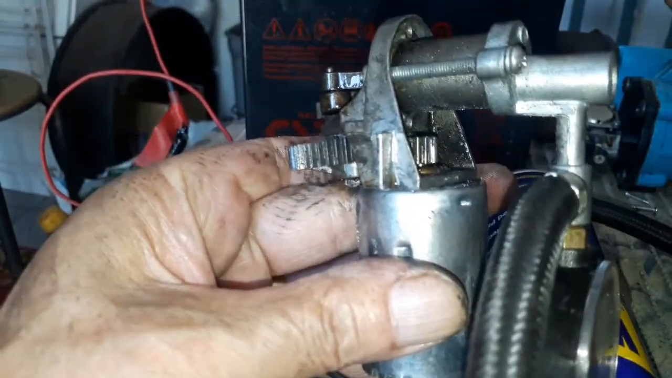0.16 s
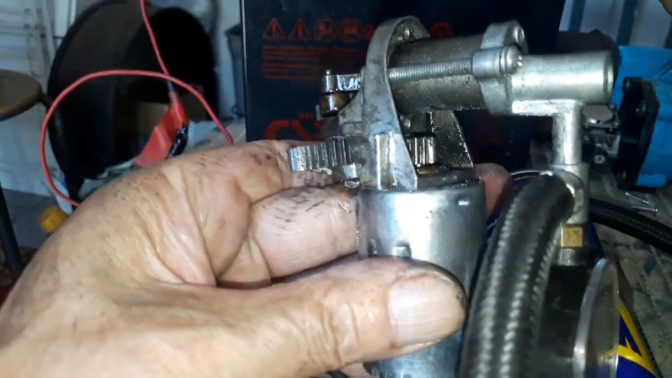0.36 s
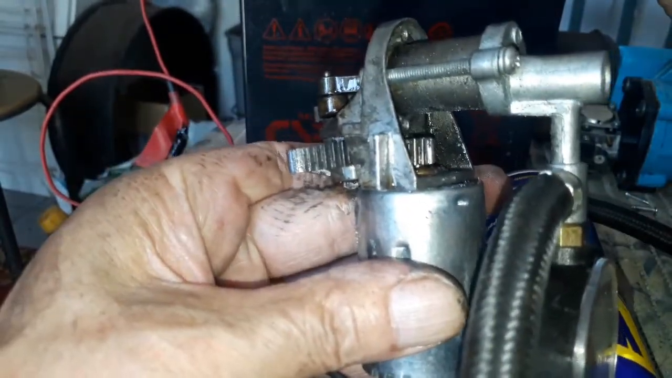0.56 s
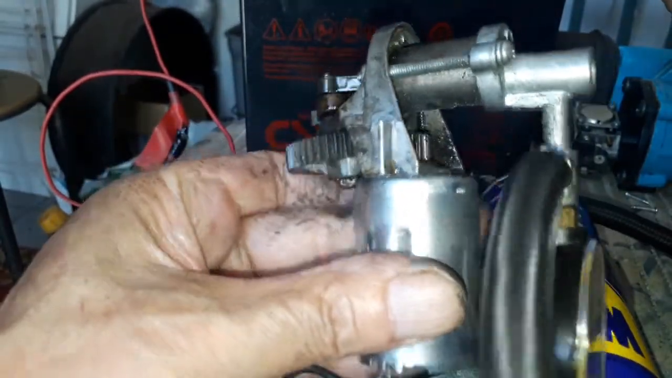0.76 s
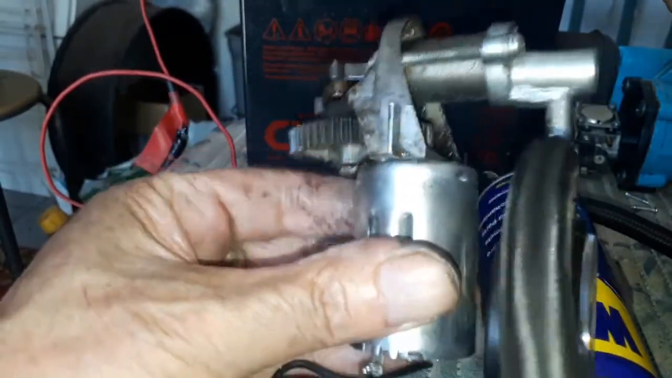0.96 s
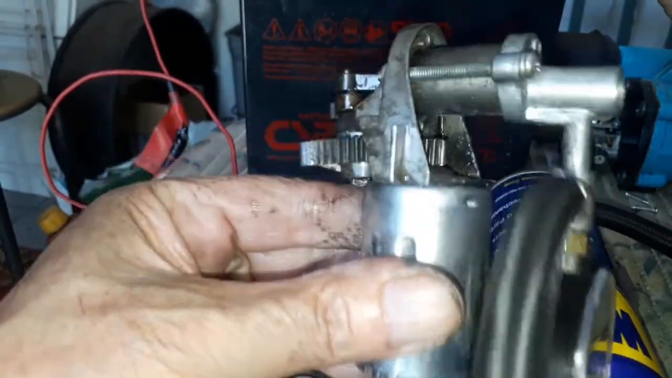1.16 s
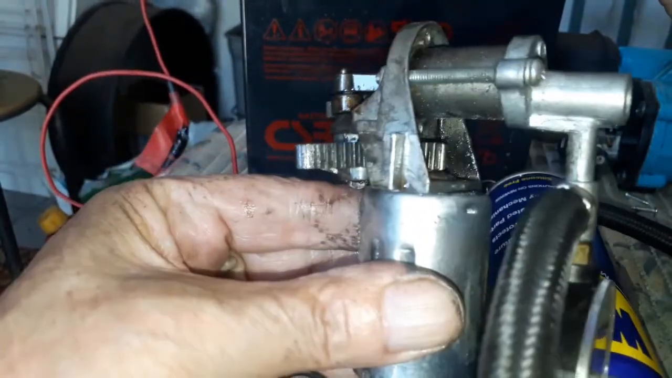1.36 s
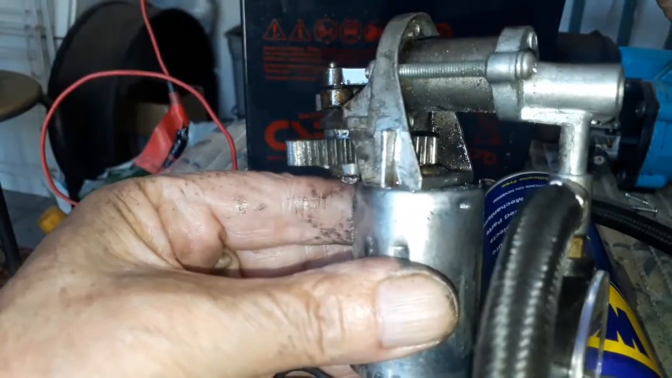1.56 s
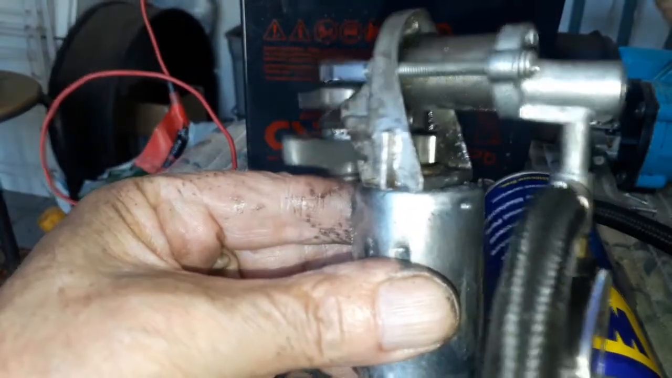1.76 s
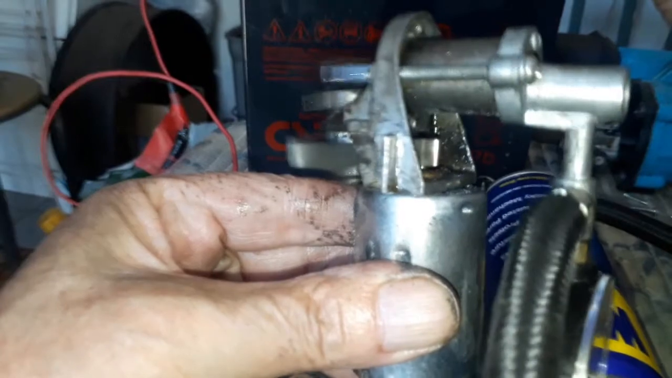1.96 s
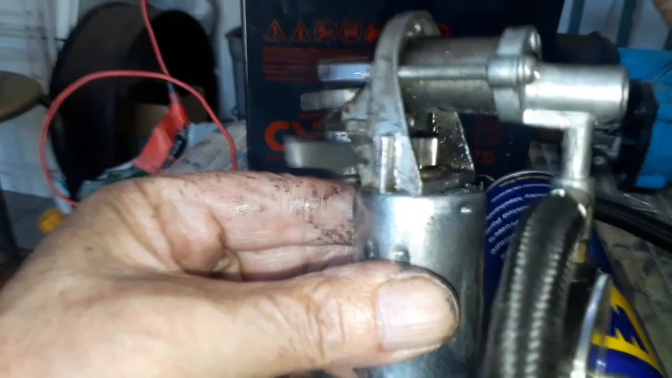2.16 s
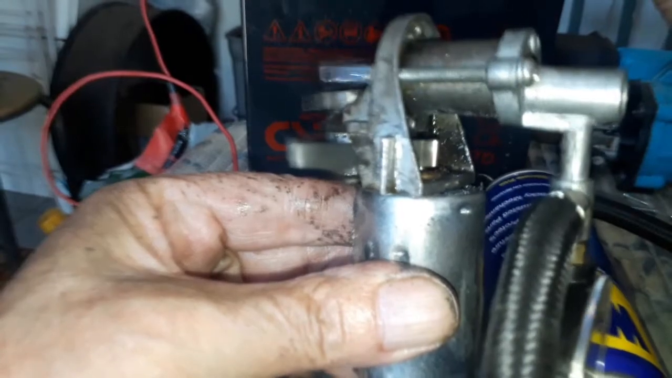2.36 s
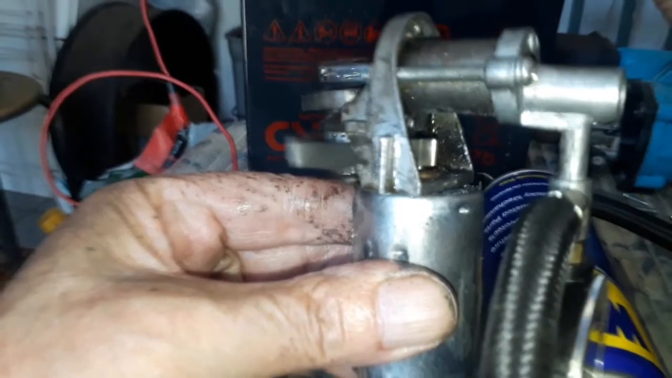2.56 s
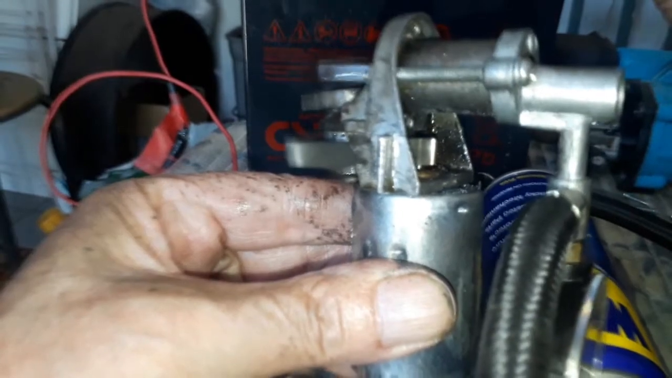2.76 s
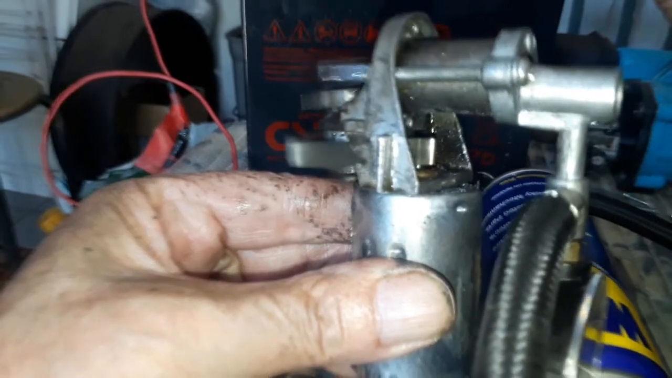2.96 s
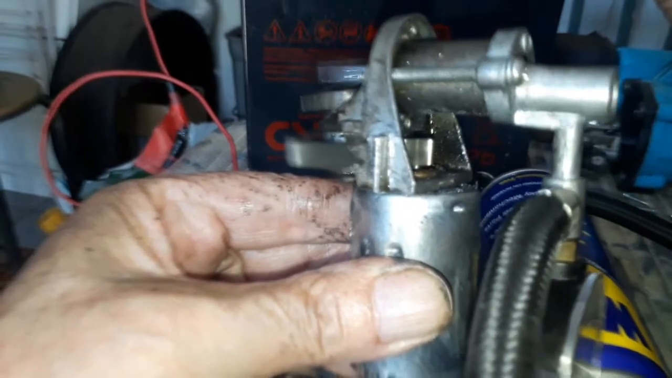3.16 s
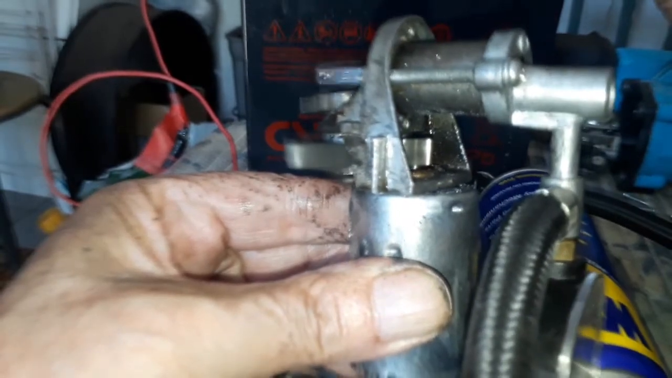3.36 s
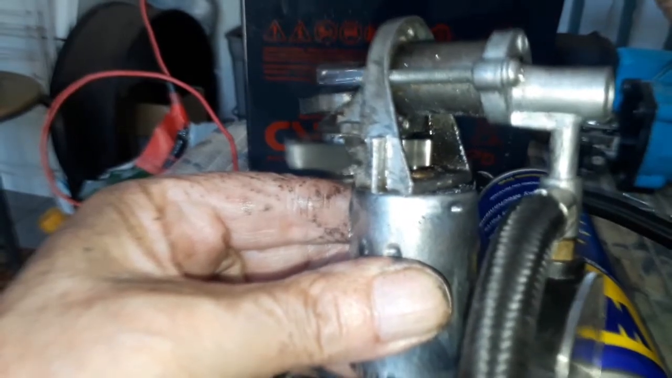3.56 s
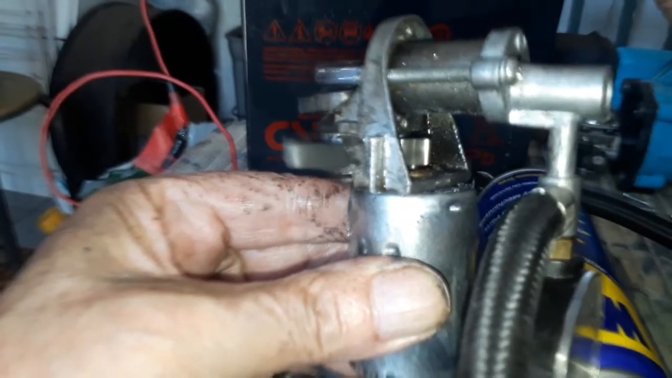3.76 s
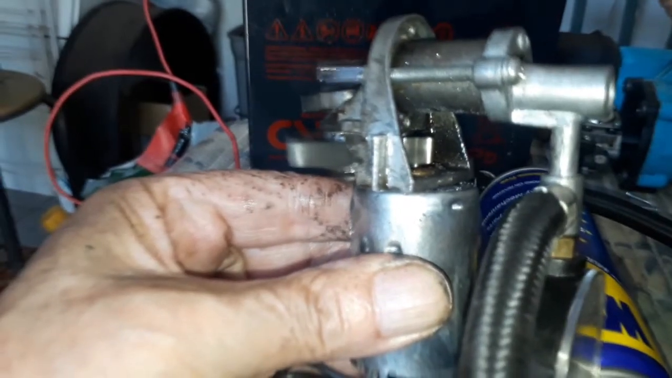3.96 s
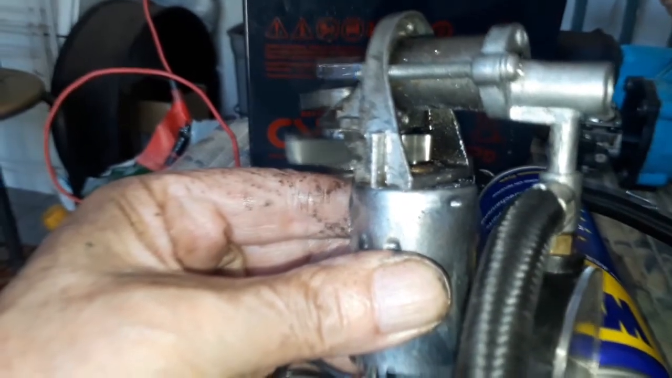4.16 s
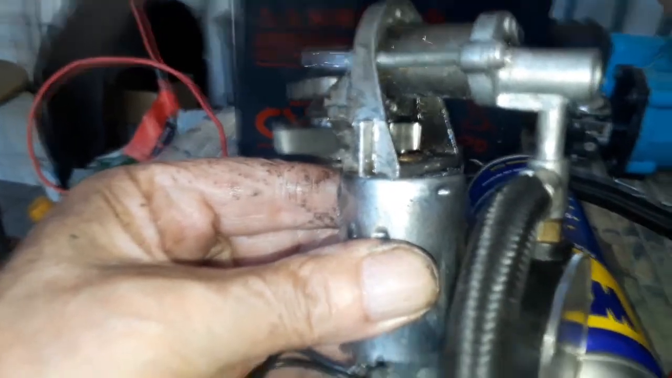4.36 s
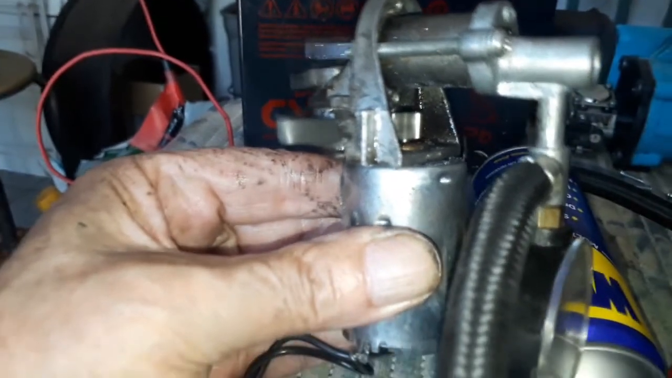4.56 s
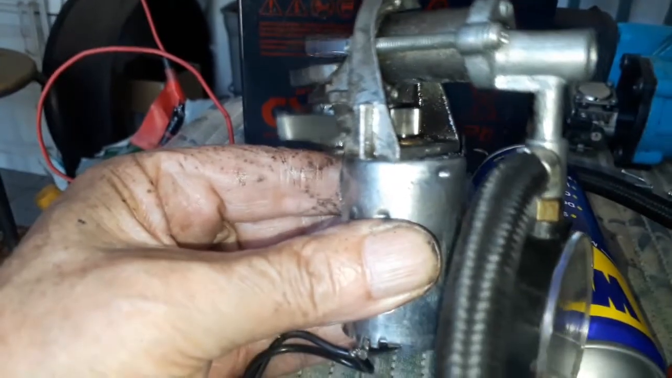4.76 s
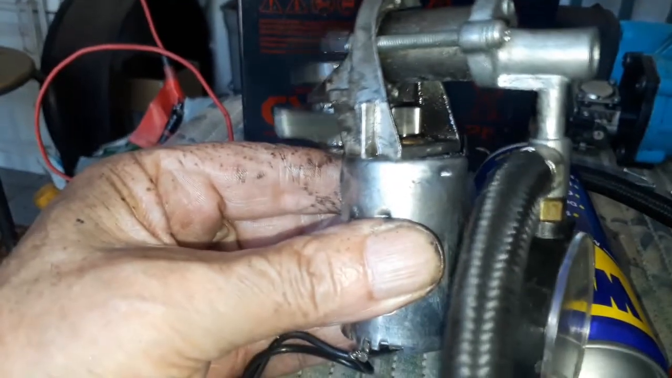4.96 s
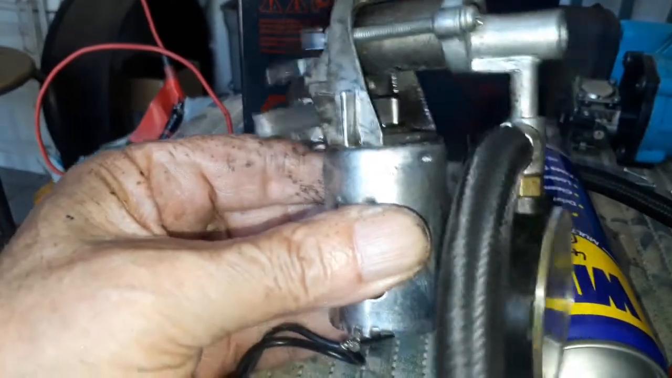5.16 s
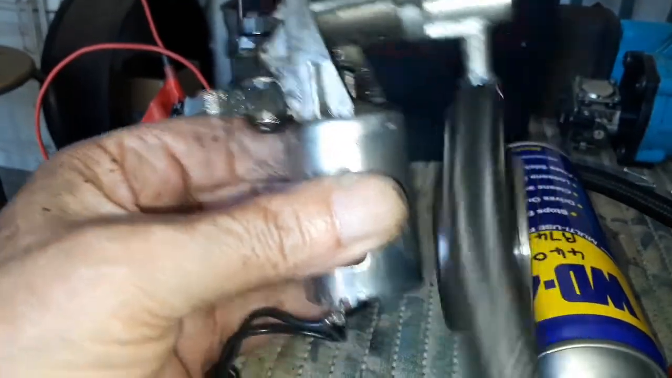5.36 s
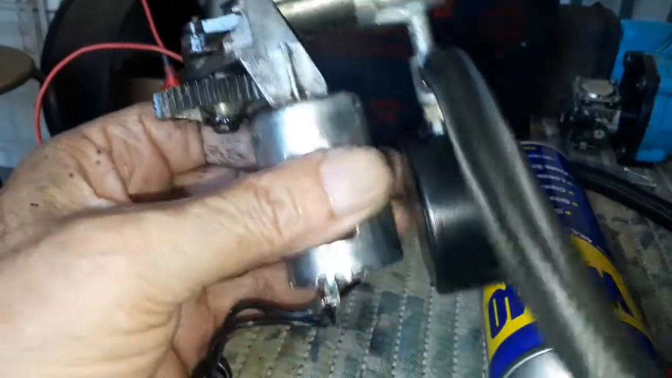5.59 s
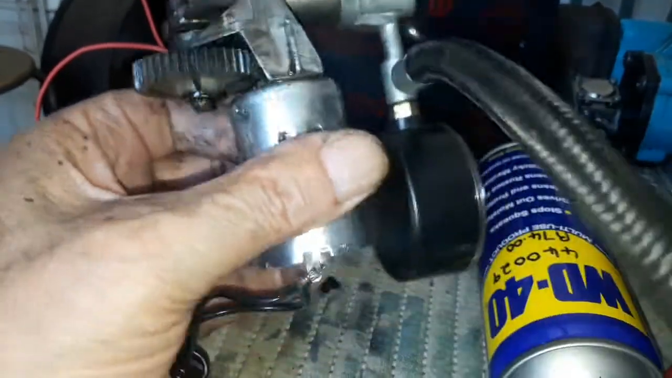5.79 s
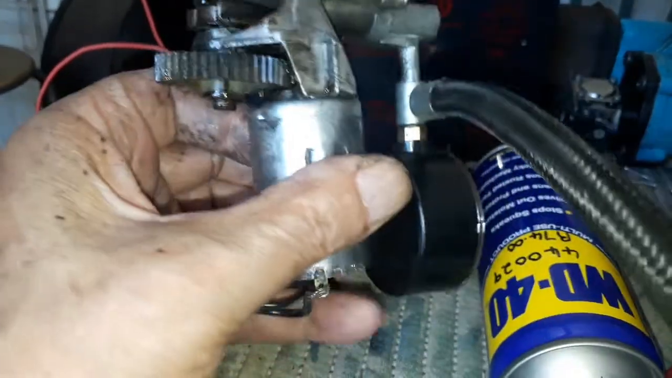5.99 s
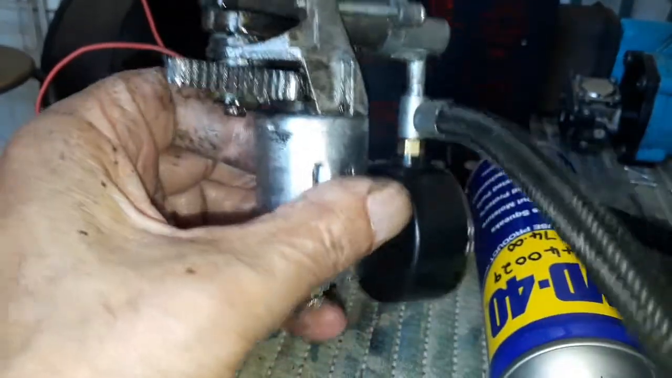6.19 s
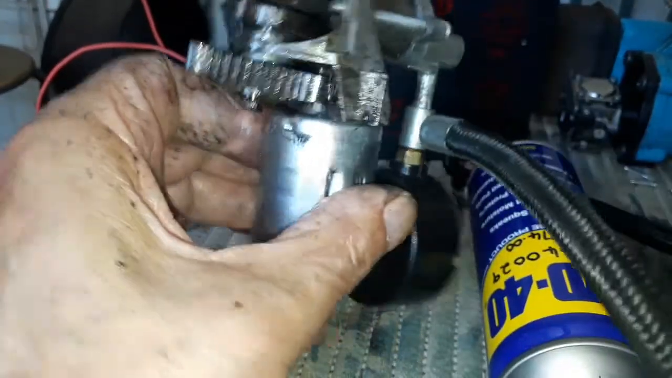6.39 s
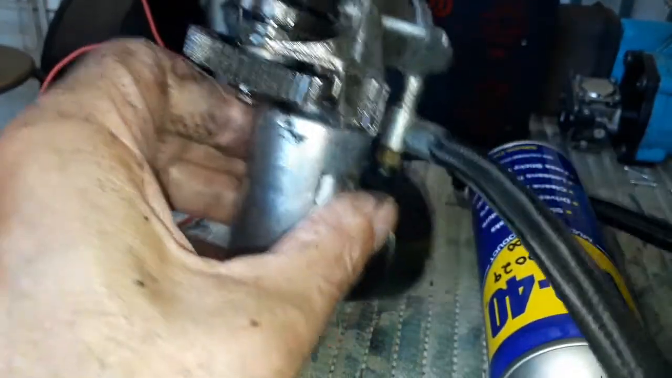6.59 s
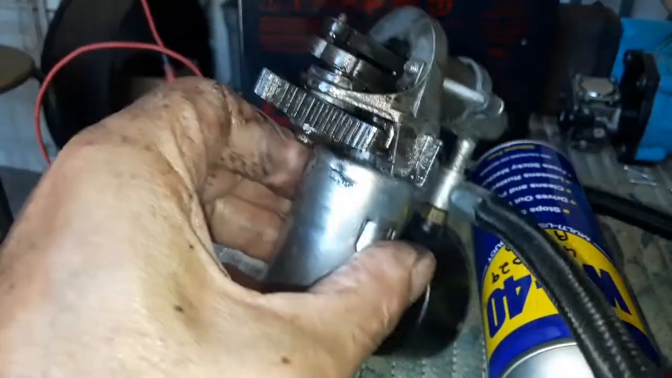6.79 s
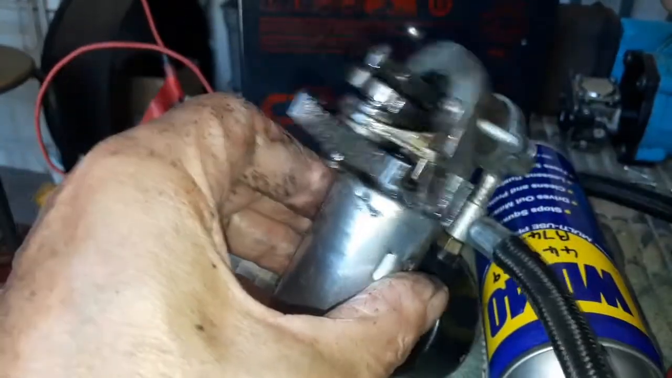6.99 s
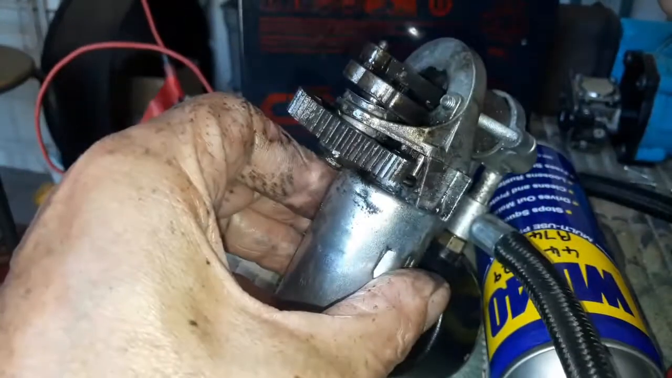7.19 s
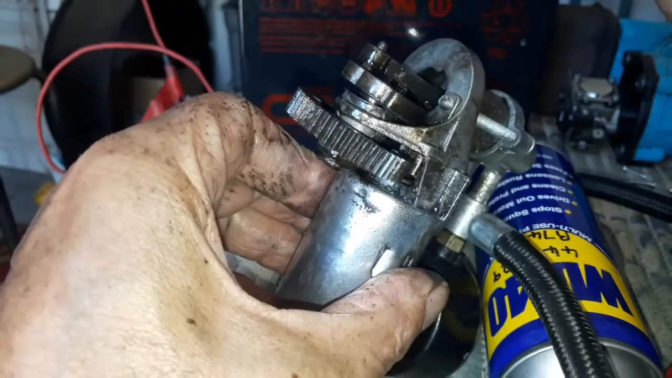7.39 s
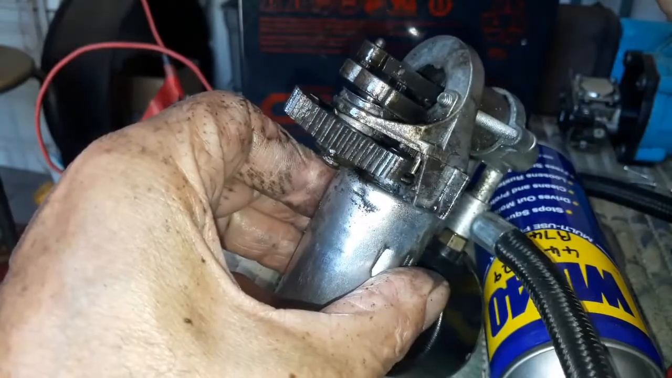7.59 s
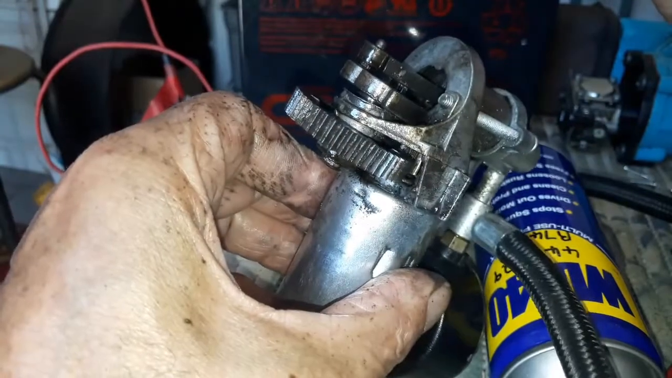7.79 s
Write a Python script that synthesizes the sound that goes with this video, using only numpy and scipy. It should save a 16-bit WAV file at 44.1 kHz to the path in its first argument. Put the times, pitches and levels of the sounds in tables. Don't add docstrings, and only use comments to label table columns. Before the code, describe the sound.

From 0 to 1.7 seconds there is soft, low room and microphone hiss with faint ticks, dull grip thuds and skin rubbing on metal, busiest around 1 second, where a fitting clinks softly. At about 1.76 a small piston compressor jerks on and climbs to full speed by 2.1. Until 4.7 it gives a loud, close, harsh metallic buzz: nearly a hundred hard knocks a second with bounces, bright ringing, rough gear chatter and little bass, only a weak hum beneath. Power goes off at 4.68; pitch and pace drop fast, breaking into irregular separate clacks around 4.9 to 5.1 and weak last ticks by 5.3. The hiss returns. Quiet taps, clinks and rustles cluster near 5.8, 6.0, 6.45 and 7.0, with a very faint high squeak at 6.1 to 6.3 and a last tap at 7.3, then only hiss. A short workshop echo follows the sounds.

```python
import sys
import numpy as np
from scipy import signal
from scipy.fft import rfft, irfft, next_fast_len
from scipy.io import wavfile
from scipy.ndimage import map_coordinates

SR = 44100
rng = np.random.default_rng(int(sys.argv[2]) if len(sys.argv) > 2 else 0)


def amp(db):
    return 10 ** (np.asarray(db, float) / 20)


def write(x):
    x = np.atleast_2d(x).T
    wavfile.write(sys.argv[1], SR, np.round(np.clip(x, -1, 1) * 32767).astype(np.int16))


N = 345556
TIME = np.arange(N) / SR

# (time [s], speed [turns/s])
CRANK_SPEED = [
    (1.755, 0),
    (1.8, 35.07),
    (1.88, 37.69),
    (1.97, 43.4),
    (2.1, 48.25),
    (4.68, 48.25),
    (4.78, 37.3),
    (4.88, 29.15),
    (5.25, 4.5),
]
# (place [part of a turn], level [dB], size scatter [dB], timing scatter [ms])
STROKE_BLOWS = [
    (0, 1.5, 2, .2),
    (.05, -5, 3.2, .35),
    (.13, -3.5, 3.5, .35),
    (.2, -11, 3.2, .6),
    (.48, 0, 2.1, .25),
    (.55, -7, 3.2, .45),
    (.62, -14, 3, .6),
]
# (time [s], peak level [dB])
SINGLE_BLOWS = [(1.7624, -14), (4.903, -3), (4.9199, 0), (4.925, -7.5), (4.941, -6), (4.9616, -1),
                (4.9837, -3.5), (5.0004, -15), (5.0048, -0.56), (5.015, -7), (5.0335, -3.5), (5.055, -11.5),
                (5.0598, -5), (5.0628, -5), (5.0726, -11), (5.0948, -5.5), (5.1297, -7.5), (5.1791, -8),
                (5.24, -13), (5.2486, -14), (5.2683, -16), (5.2744, -24), (5.2842, -19), (5.2984, -24),
                (5.3084, -26)]
# (time [s], length [s], level [dB])
SPURTS = [
    (5.12, .07, -29),
    (5.172, .075, -33),
    (5.225, .115, -35),
]
# (frequency [Hz], level [dB per Hz])
KNOCK_TONE = [(70, -40), (150, -25.5), (300, -15), (650, -11.5), (1050, -12.5), (1900, -5), (2980, 0),
              (4420, -1), (6680, 0), (7700, -6), (9500, -14.5), (12000, -14.5), (15300, -15.5),
              (16500, -20)]
# (frequency [Hz], level [dB per Hz])
RATTLE_TONE = [(60, -40), (110, -24), (230, -5.5), (350, -18), (655, -6.5), (1050, -11.5), (2920, -2.5),
               (4390, -6.5), (6730, -2.5), (9470, -15.5), (15100, -15.5), (16500, -20)]
# (frequency [Hz], width [Hz], lift [dB])
FRAME_RINGS = [(651, 40, -1.5), (2081, 94, -2), (2980, 110, -12), (3928, 200, -7), (5480, 200, -6),
               (6950, 630, -3.5), (9300, 110, -13), (11360, 2000, -3), (12600, 1800, -11), (14800, 500, -9)]
# (multiple of the crank speed, level [dB])
CRANK_HUM = [(1, -4), (3, -4), (5, 1.5), (6, -9.5), (7, -4), (8, -12), (9, -2), (10, -1), (11, -6),
             (12, -1), (13, -2.5), (14, -4)]
# (multiple of the motor speed, level [dB])
MOTOR_HUM = [(1, -3), (3, -2), (5, -9)]

# (time [s], peak level [dB], ring [Hz])
TAPS = [(0.874, -54, 576), (1.041, -57, 678), (1.1, -49, 480), (5.514, -57, 544), (5.523, -55, 544),
        (5.808, -41, 2000), (5.833, -41, 693), (5.85, -53, 620), (6.024, -41, 753), (6.406, -61, 887),
        (6.464, -47, 1046), (6.687, -49.5, 684), (6.944, -59.5, 1070), (6.984, -45.5, 890),
        (6.999, -45.5, 687), (7.025, -60.5, 697), (7.311, -42, 1060)]
# (time [s], peak level [dB], tick [Hz], ring [Hz])
TICKS = [(0.246, -65, 2570, 1210), (0.748, -64, 2690, 861), (0.86, -71, 2200, 2120),
         (0.996, -55, 2200, 2070), (1.028, -52.5, 5300, 2170), (1.523, -57, 2310, 530),
         (1.649, -74, 2260, 1020), (5.669, -70, 5590, 1160), (5.808, -59, 4500, 700),
         (5.841, -56, 4500, 664), (5.853, -64, 5020, 1500), (6.026, -60, 2300, 1980),
         (6.03, -66, 6040, 2000), (6.266, -65, 3000, 1480), (6.267, -68, 6000, 1480),
         (6.424, -70, 3770, 619), (6.809, -76, 6860, 557), (6.984, -64, 5570, 890)]
# (time [s], peak level [dB])
THUDS = [(0.569, -62), (1.012, -55), (1.045, -60), (1.238, -48), (1.523, -59), (5.845, -58), (6.03, -61),
         (6.599, -65), (6.69, -59), (6.748, -55), (6.81, -62), (6.975, -60), (7.005, -54), (7.025, -60)]
# (time [s], peak level [dB])
CLINKS = [
    (0.9946, -51),
    (1.0291, -54),
    (5.8087, -43),
    (5.8386, -47),
    (6.0257, -50),
]
# (frequency [Hz], level [dB], time to fall 60 dB [s])
FITTING_RINGS = [(1542, -15, 0.18), (2000, -4, 0.071)]
# (peak time [s], time to fall 20 dB [s], level [dB])
RUSTLES = [
    (.865, .03, -65),
    (.995, .045, -56),
    (1.105, 0.02, -63),
    (1.15, 0.1, -69),
    (5.675, 0, -68.5),
    (5.79, .09, -67),
    (5.85, 0.1, -65),
    (6.02, 0.1, -61.5),
    (6.995, 0.08, -57.5),
]
# (peak time [s], time to fall 20 dB [s], level [dB])
SCUFFS = [
    (.865, .05, -71),
    (1.11, .06, -68),
    (5.675, .04, -69),
]
# (frequency [Hz], level [dB per Hz])
SKIN_TONE = [(70, -26.5), (130, -2), (500, -6), (750, -5), (1200, -9), (2600, -15), (3800, -22),
             (5800, -16), (7500, -23.5), (16000, -36.5)]
# (time [s], pitch [Hz], level [dB])
SQUEAK = [
    (6.041, 2980, -94),
    (6.08, 3120, -79),
    (6.13, 3200, -77),
    (6.19, 3100, -88),
    (6.3, 3030, -75),
    (6.33, 3020, -95),
]

# (frequency [Hz], time to fall 60 dB [s])
SHOP_DECAY = [(200, 0.6), (2000, .35), (7000, 0.27), (14000, 0.05)]
# (frequency [Hz], level [dB per Hz])
AIR_TONE = [(30, -20), (55, -15.5), (110, 1), (200, -1.5), (330, -6.5), (700, -12.5), (1500, -16),
            (3000, -18), (5000, -22), (6600, -19), (8000, -28.5), (9800, -27.5), (12500, -23), (16500, -28)]
# (time [s], rounding step over the mean line [dB])
COARSE_MOMENTS = [(2.1753, 13), (2.3033, 13), (2.4527, 14), (2.666, 13), (2.7727, 13), (3.626, 14),
                  (3.6687, 14), (4.3513, 12), (4.6713, 11), (4.855, 17), (5.098, 14)]

GEAR_RATIO = 4.6
POWER_OFF_S = 4.68


def unit(x):
    return x / np.sqrt(np.mean(x ** 2) + 1e-30)


def curves(rows, outside):
    s, *cols = np.transpose(rows)
    return [np.interp(TIME, s, c, outside, outside) for c in cols]


def along(points, hz):
    f, v = np.transpose(points)
    return np.interp(np.log(hz + 1), np.log(f + 1), v)


def wobble(rate):
    knots = rng.standard_normal(int(N * rate / SR) + 4)
    return map_coordinates(knots, [TIME * rate])


def coloured(x, spectrum, peaks=()):
    m = 2 * next_fast_len(len(x) // 2 + 4096)
    hz = np.fft.rfftfreq(m, 1 / SR)
    lift = sum(amp(db) / (1 + (2 * (hz - centre) / width) ** 2) for centre, width, db in peaks)
    gain = amp(along(spectrum, hz)) * (1 + lift)
    cepstrum = irfft(np.log(gain + 1e-6), m)
    cepstrum[1:m // 2] *= 2
    cepstrum[m // 2 + 1:] = 0
    return irfft(rfft(x, m) * np.exp(rfft(cepstrum)), m)[:len(x)]


def band(x, lo_hz, hi_hz):
    return signal.sosfilt(signal.butter(2, [lo_hz, hi_hz], "bandpass", fs=SR, output="sos"), x)


def bursts(times, sizes, rise, t60):
    places = np.clip(np.round(times * SR).astype(int), 0, N - 1)
    marks = np.bincount(places, sizes ** 2, N)
    t = TIME[:SR // 20]
    shape = amp(-60 * t / t60) * (1 - np.exp(-t / rise))
    power = signal.fftconvolve(marks, shape ** 2)[:N]
    return np.sqrt(np.abs(power)) * rng.standard_normal(N)


def compressor():
    speed, = curves(CRANK_SPEED, 0)
    start_turn = .49
    angle = start_turn + np.cumsum(np.abs(speed)) / SR
    pace = speed / speed.max()
    knock_db, rattle_gain, hum_gain = effort(pace)
    knocks = stroke_knocks(speed, angle, start_turn, knock_db)
    rattle = gear_rattle(angle)
    knocks = dull(knocks, .4 * (1 - pace))
    rattle = dull(rattle, .7 * (1 - pace))
    return knocks + rattle_gain * rattle + hum_gain * hum(angle, pace)


def effort(pace):
    powered = TIME < POWER_OFF_S
    surge = powered * np.clip((1 - pace) / .2, 0, 1)
    decades = np.log10(pace + 1e-12)
    settle_db = 1.06 * np.exp(-np.abs(TIME - CRANK_SPEED[0][0]) / .6)
    knock_db = -16.2 + 14 * decades + 1.2 * surge + settle_db
    rattle_db = -26.6 + 10.5 * decades + 5 * surge + settle_db
    engage_s = 1.7615
    driven = np.where(TIME < engage_s, .05, 1)
    coasting = np.clip((pace - .21) / .08, 0, 1)
    rattle = np.where(powered, driven, coasting) * amp(rattle_db)
    for s, length, db in SPURTS:
        progress = np.clip((TIME - s) / length, 0, 1)
        rattle = rattle + amp(db) * np.sin(np.pi * progress ** .6) ** 2
    hum_gain = amp(-45.5 + 7 * (1 - pace))
    return knock_db, rattle, hum_gain


def stroke_knocks(speed, angle, start_turn, knock_db):
    part, db, size_db, ms = np.transpose(STROKE_BLOWS)
    turns = np.arange(int(angle[-1]) + 1)[:, None]
    time_chance, size_chance = rng.standard_normal((2, len(turns), len(part)))
    ends = .96 * np.round(2 * part - .4) / 2
    lag = (part - ends) / speed.max()
    at = turns + ends
    steady_until = 4.895
    inside = (at > start_turn) & (at < angle[round(steady_until * SR)])
    times = np.interp(at, angle, TIME) + lag - .0008 + time_chance * ms / 1000
    slow_db = -7 * np.log10(np.interp(times, TIME, speed + 3) / speed.max())
    blow_db = db + size_db * size_chance + slow_db + np.interp(times, TIME, knock_db) + 9
    sizes = inside * amp(blow_db)
    s, peak_db = np.transpose(SINGLE_BLOWS)
    all_times = np.r_[times.ravel(), s]
    all_sizes = np.r_[sizes.ravel(), amp(peak_db - 4)]
    blows = bursts(all_times, all_sizes, rise=.00045, t60=.013)
    impulse = np.zeros(N)
    impulse[0] = 1
    answer = coloured(impulse, KNOCK_TONE, FRAME_RINGS)
    return coloured(blows, KNOCK_TONE, FRAME_RINGS) / np.linalg.norm(answer)


def gear_rattle(angle):
    swell_db = 2.5 * wobble(900) + wobble(60) + np.cos(2 * np.pi * GEAR_RATIO * angle)
    return unit(coloured(amp(swell_db) * rng.standard_normal(N), RATTLE_TONE, FRAME_RINGS))


def dull(x, share):
    return (1 - share) * x + share * band(x, 110, 8100)


def hum(angle, pace):
    crank_turn = angle - .06 + .004 * wobble(14)
    motor_turn = GEAR_RATIO * angle + .025 * wobble(6)
    both = np.zeros(N)
    for k, db in CRANK_HUM:
        both += amp(db + 1.3 * wobble(12)) * pace ** (6 / k) * np.sin(2 * np.pi * k * crank_turn)
    for k, db in MOTOR_HUM:
        both += amp(db + 1.5 * wobble(10)) * pace * np.sin(2 * np.pi * k * motor_turn)
    fade = pace ** np.where(TIME < POWER_OFF_S, .5, 2)
    return band(both * fade, 120, 4000)


def hand():
    return hand_clicks() + hand_rubs() + squeak()


def clicks():
    taps = [(s, db, -68, db - 27, hz, 4000) for s, db, hz in TAPS]
    ticks = [(s, db + 3, db - 9, db, hz, tick_hz) for s, db, tick_hz, hz in TICKS]
    thuds = [(s, db - 4, db, db - 24, 450, 3000) for s, db in THUDS]
    return taps + ticks + thuds


def hand_clicks():
    out = np.zeros(N + SR)
    t = TIME[:SR // 3]
    rise = 1 - np.exp(-t / 0.00039)
    push = 3.5 * band(np.sin(2 * np.pi * 170 * t) * amp(-60 * t / .035), 95, 900)
    for s, ring_db, thud_db, tick_db, hz, tick_hz in clicks():
        decay = amp(-60 * t / [[.022], [.05], [.022]])
        body, rough, bright = rng.standard_normal((3, len(t))) * decay * rise
        tone = np.sin(2 * np.pi * hz * t) * amp(-60 * t / 0.031) * rise
        ring = amp(ring_db) * (1.6 * band(body, 500, 1300) + 0.92 * tone)
        thud = amp(thud_db) * (push + amp(13) * band(rough, 80, 350))
        tick = amp(tick_db + 18.5) * band(bright, tick_hz / 1.4, tick_hz * 1.21)
        out[round(s * SR):][:len(t)] += ring + thud + tick
    for s, db in CLINKS:
        for hz, level, t60 in FITTING_RINGS:
            tone = amp(db + level - 60 * t / t60) * np.sin(2 * np.pi * hz * t)
            out[round(s * SR):][:len(t)] += rise * tone
    return out[:N]


def strokes(rows):
    return sum(amp(db - 20 * np.abs(TIME - s) / fall) for s, fall, db in rows)


def hand_rubs():
    grain = amp(3 * wobble(150)) * rng.standard_normal(N)
    rub = strokes(RUSTLES) * unit(coloured(grain, SKIN_TONE))
    scuff = strokes(SCUFFS) * unit(band(rng.standard_normal(N), 4500, 6600))
    return rub + scuff


def squeak():
    hz, = curves([row[:2] for row in SQUEAK], 0)
    db, = curves([row[::2] for row in SQUEAK], -120)
    return amp(db + 2 * wobble(40)) * np.sin(2 * np.pi * np.cumsum(hz) / SR)


def shop(x):
    hz, t, z = signal.stft(rng.standard_normal(SR // 2), SR, nperseg=256)
    decay = amp(-60 * t / along(SHOP_DECAY, hz)[:, None])
    tail = signal.istft(z * decay, SR, nperseg=256)[1]
    late = np.pad(x, (250, 0))
    return signal.fftconvolve(late, tail / np.linalg.norm(tail))[:N]


def room_air():
    duck_db = -4 * np.exp(-np.abs(TIME - 5.4) / .2)
    level = amp(-67.5 + duck_db + .6 * wobble(6.4))
    return level * unit(coloured(rng.standard_normal(N), AIR_TONE))


def scene():
    machine, grip = compressor(), hand()
    echo = shop(amp(-16) * machine + amp(-22) * grip)
    return (machine + grip + echo + room_air())[None]


def coarse(x):
    block = 941
    n, k = np.arange(2 * block) + .5, np.arange(block) + .5
    window = np.sin(np.pi * n / (2 * block))[:, None]
    basis = window * np.cos(np.pi / block * np.outer(n + block / 2, k))
    tilt_db = along([(300, -4), (1500, 1), (7000, 0), (9000, -7)], k * SR / (2 * block))
    out = x.copy()
    for s, step_db in COARSE_MOMENTS:
        part = slice(round(s * SR) - block, round(s * SR) + block)
        lines = x[part] @ basis
        step = amp(step_db + tilt_db) * lines.std()
        change = np.round(lines / step) * step - lines
        out[part] += basis @ change * 2 / block
    return out


def top_cut(x):
    return signal.sosfilt(signal.butter(12, 16720, fs=SR, output="sos"), x)


def record(dry):
    clipped = np.clip(dry[0], -.85, .85)
    low_pass = signal.ellip(14, .1, 45, 15780, fs=SR, output="sos")
    kept = signal.sosfiltfilt(low_pass, coarse(clipped))
    mix = kept[None] - .0003
    return top_cut(mix)


dry = scene()
out = record(dry)
write(out)
```